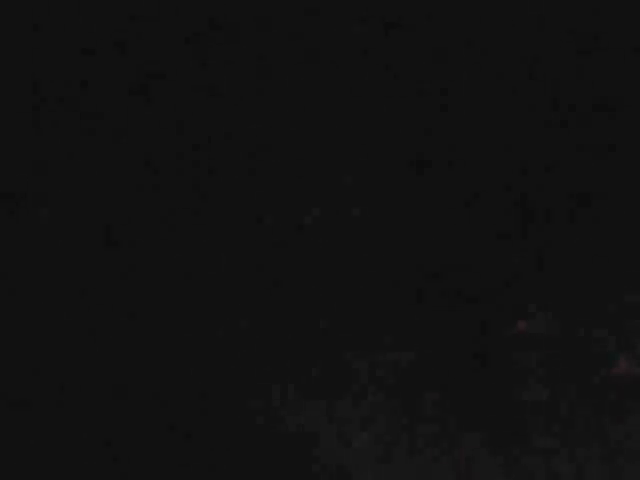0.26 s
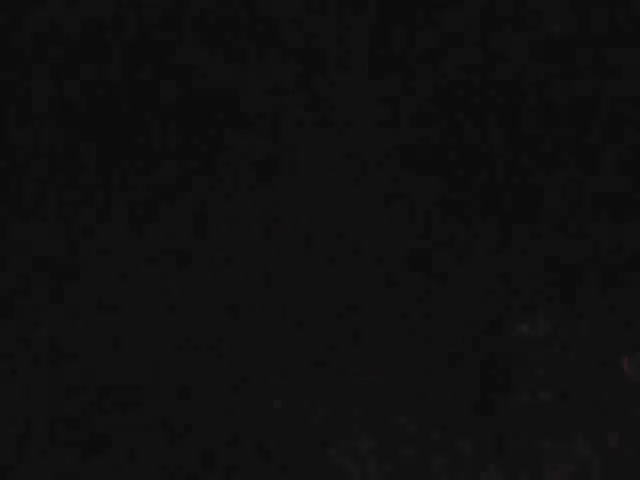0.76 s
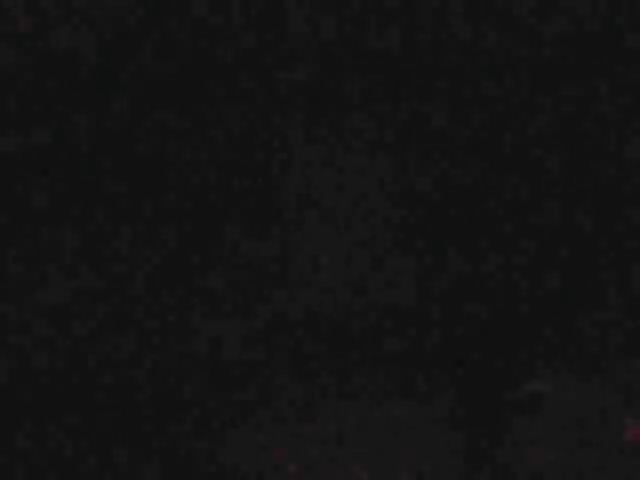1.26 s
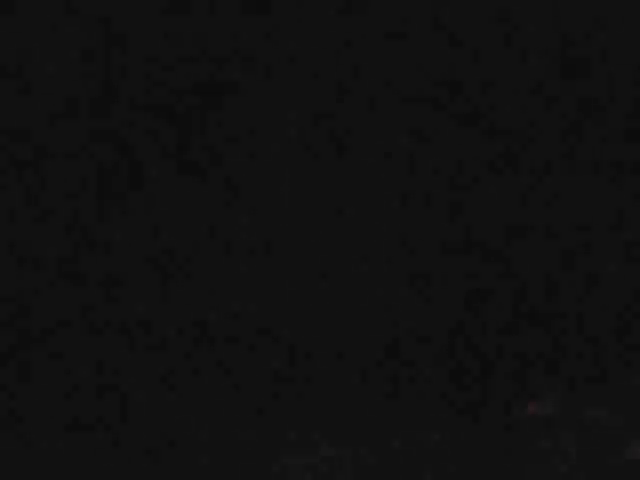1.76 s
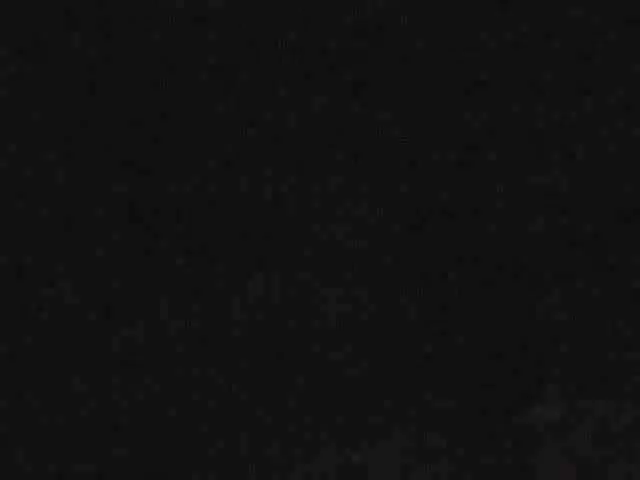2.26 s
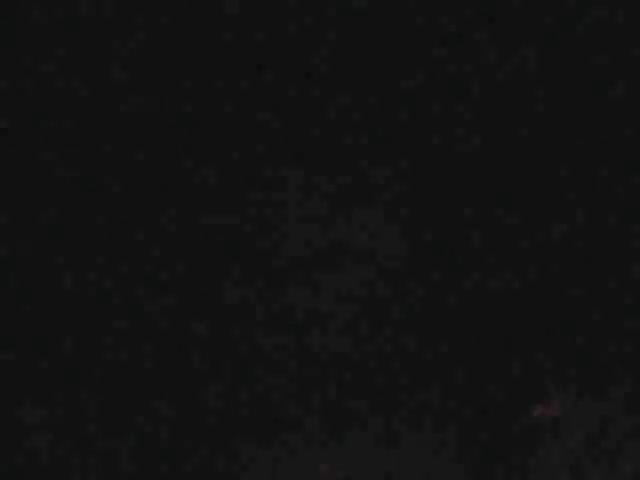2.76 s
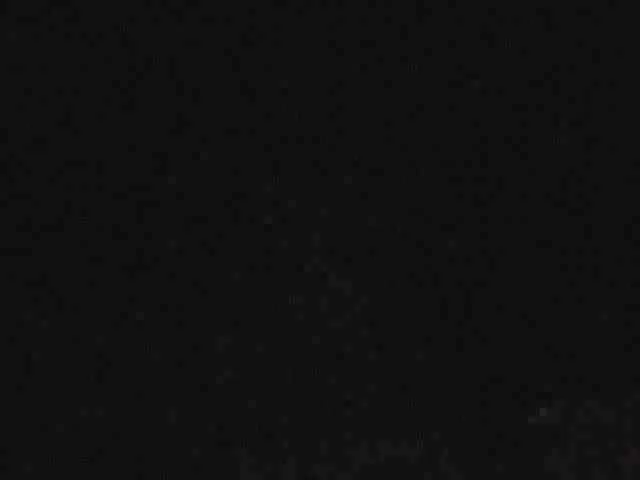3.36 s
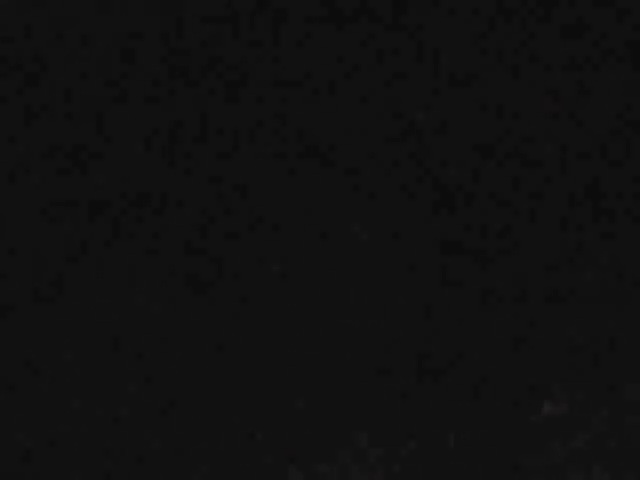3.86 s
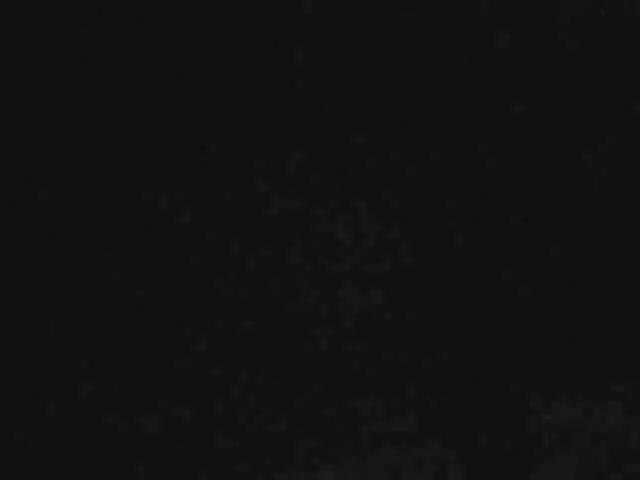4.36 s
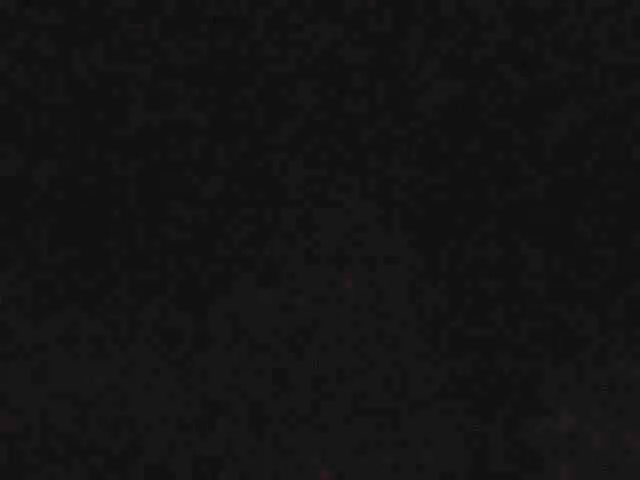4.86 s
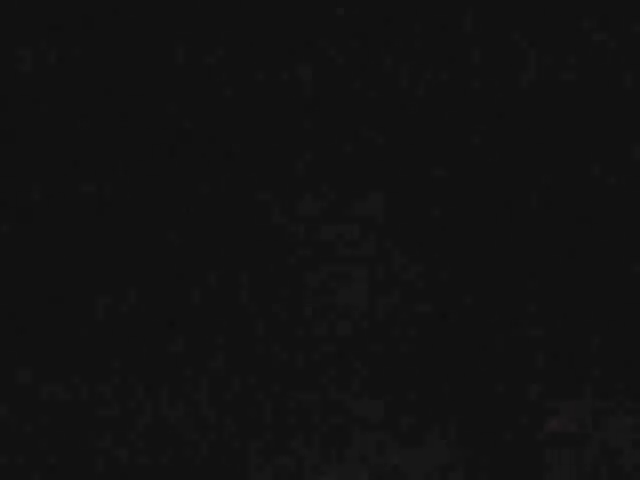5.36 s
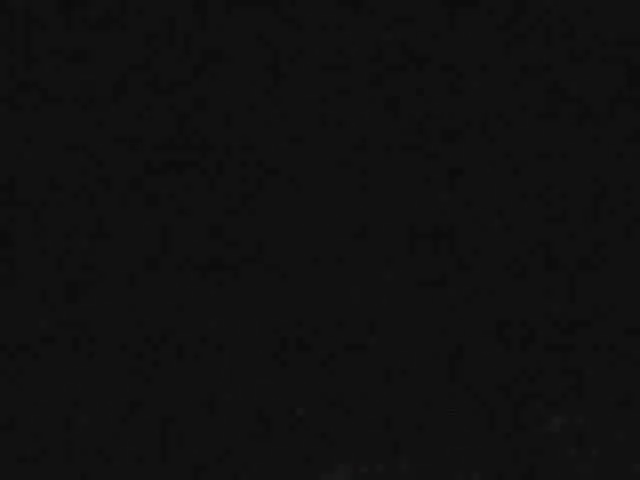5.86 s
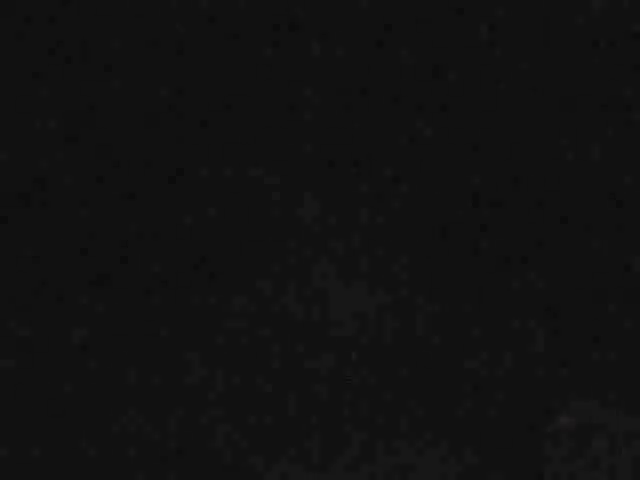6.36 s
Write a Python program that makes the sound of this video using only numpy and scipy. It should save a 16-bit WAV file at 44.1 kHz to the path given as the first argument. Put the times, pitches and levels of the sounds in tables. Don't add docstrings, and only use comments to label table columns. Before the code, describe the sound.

An unseen animal screams harshly in a dark, echoing yard, its raspy calls falling in pitch, between small squeaks and a fainter distant answer.

```python
import sys
import numpy as np
from scipy import signal
from scipy.fft import rfft, irfft
from scipy.io import wavfile

SR = 44100
rng = np.random.default_rng(int(sys.argv[2]) if len(sys.argv) > 2 else 0)


def output_pcm(signal):
    pcm = np.clip(np.atleast_2d(signal).T, -1, 1) * 32767
    wavfile.write(sys.argv[1], SR, np.round(pcm).astype(np.int16))


def decibels_to_gain(level_db):
    exponent = np.asarray(level_db, float) / 20
    return 10 ** exponent


N = 291942
LEAD = SR // 2

# (frequency [Hz], density [dB per Hz])
NIGHT_SPECTRUM = [(13, -39), (22, -15), (27, -8), (59, 0), (159, -8.5), (193, -6), (369, -13), (692, -19.5),
                  (762, -13.5), (839, -16.5), (1040, -13), (1360, -20), (4650, -32.5), (7000, -55),
                  (9100, -92), (15400, -120)]
NIGHT_DB = -45.5
# (start [s], end [s])
HORN = [(432, -54)]
HORN_SPAN = (1.6, 1.74)
# (time [s], peak level [dB], frequency [Hz])
TWIGS = [
    (0.0344, -34, 2960),
    (0.1621, -28, 3040),
    (0.7382, -16, 3266),
]

# (delay [s], level [dB])
WALLS = [
    (.03, -12),
    (.075, -6.5),
    (.19, -16),
    (.3, -20),
]
# (centre [Hz], decay time t60 [s], level [dB])
RINGING = [(554, 3.2, -1.5), (1350, 1.9, -8), (2256, 1.23, -1.5), (5400, 1.1, -7)]
# (delay [s], spread [s], level [dB], top [Hz])
FAR_RETURN = (.53, .05, -10, 850.0)

# (time [s], pitch [Hz], effort [dB])
EARLIER_BREATH = [(-.4, 585, -33), (-.2, 546, -39.5), (-.04, 540.5, -49.5), (.12, 547, -69)]
SCREAM_1_BREATH = [(.375, 584, -34.5), (.41, 576.3, -25.5), (.52, 565.8, -24.5), (.75, 551.1, -24.5),
                   (.89, 522, -27.5), (1.0, 472, -25.5), (1.08, 426.5, -33), (1.12, 419, -31)]
BARK_1_BREATH = [(1.35, 508, -28.5), (1.39, 517.2, -25.5), (1.41, 506, -27.5), (1.46, 416.5, -37.5),
                 (1.52, 363, -44)]
BARK_2_BREATH = [(1.81, 566, -44), (1.846, 585.6, -31), (1.91, 599.2, -33), (1.96, 589, -39.5)]
SCREAM_2_BREATH = [(2.7, 545.5, -29.5), (2.72, 562, -23), (2.78, 536, -28.5), (2.86, 503, -31.5),
                   (2.92, 378.5, -33), (2.96, 319, -27.5)]
SCREAM_3_BREATH = [(4.065, 517.5, -41.5), (4.11, 540, -23), (4.19, 517, -28.5), (4.35, 502.3, -31.5),
                   (4.38, 463.4, -30), (4.412, 386, -30), (4.455, 318, -27)]
SCREAM_4_BREATH = [(5.35, 565.7, -40), (5.41, 573.8, -23.5), (5.58, 566.4, -23.5), (5.64, 561.7, -20),
                   (5.85, 550, -22.5), (5.93, 539.7, -21.5), (6.0, 521, -24.5), (6.07, 407.2, -27.5),
                   (6.12, 370, -31.5)]
# (frequency [Hz], level [dB])
WIDE_THROAT = [(1120, -18), (1900, -6.5), (2520, -6), (2770, 0), (3000, -12), (4550, -11.5), (4800, -19.5),
               (6520, -26.5), (7000, -33), (9100, -85), (15400, -120)]
TIGHT_THROAT = [(940, -34.5), (1600, 1.5), (1870, -15), (2190, -1), (3530, -11.5), (3750, -6),
                (5110, -25.5), (6190, -21), (7000, -43), (9100, -71), (15400, -120)]
NARROWING_THROAT = [(1060, -38), (1800, -5.5), (2030, -10.5), (2650, -3), (3330, -17.5), (3620, -8),
                    (4150, -10.5), (5670, -28.5), (7000, -17.5), (9100, -80), (15400, -120)]
OPEN_THROAT = [(1120, -66), (1900, -10.5), (2190, -0.5), (2460, -4.5), (2880, 1.5), (3100, -23),
               (3300, -6.5), (5100, -12), (7000, -25.5), (9100, -70), (15400, -120)]
BARK_THROAT = [(1120, -44), (1900, -14), (2560, -11), (2910, -7), (3160, -24.5), (3660, -14), (5130, -30),
               (7000, -34.5), (9100, -80), (15400, -120)]
# (frequency [Hz], level [dB])
DISTANT_THROAT = [(3000, 0), (3700, -1), (4300, -16), (6000, -26)]
# (lowest line re effort [dB], next line re effort [dB], bloom of both [dB/s],
# change of the next line [dB per octave of fall])
CALL_VOICES = [(-13, -10.5, 2.5, -10.5), (-16.5, -14, 13.7, -22), (-7, -18, 2.5, -14), (-19, -12, 9, -10.5),
               (-11, -12.5, 30, -44.5), (-11, -12, 17, -37.5), (-18.5, -16.5, 17.2, -15.5)]
CALL_MOUTHS = [(1.31, .3), (.97, .45), (0.83, 0.22), (1.0, 0.00061), (0.949, -0.081), (0.972, 0.093),
               (1.029, .75)]
CALL_HOARSENESS = [
    [(0, .6), (1, .5)],
    [(0, .22), (.48, .25), (.55, .9), (.75, .8), (1, .45)],
    [(0, .8), (1, .9)],
    [(0, .7), (1, .65)],
    [(0, .45), (.6, .3), (1, .7)],
    [(0, .45), (.4, .2), (.75, .15), (.9, .7), (1, .7)],
    [(0, .4), (.2, .4), (.3, .2), (.38, .45), (.65, .38), (.76, .12), (1, .2)],
]
# (start [s], end [s])
SHRILL = [(4522, -31.5), (5373, -46), (5652, -44.5), (6503, -39.5)]
SHRILL_SPAN = (5.51, 5.64)

# (start [s], length [s], pitch [Hz], end pitch factor [1], peak level [dB])
SQUEAK_NOTES = [
    (.352, 0.11, 1860, 1.1, -41),
    (1.335, .075, 1958, .98, -33.5),
    (1.793, 0.069, 1680, 1.1, -42),
    (2.67, .065, 1724, 1.05, -35.5),
    (4.05, 0.17, 1670, 1.04, -42.5),
]
YELP_NOTES = [
    (1.96, .11, 1719, 0.8, -29.5),
]
SWELL_NOTES = [
    (5.24, 0.18, 1580, .86, -37.5),
]
PEEP_NOTES = [
    (5.31, .1, 1294, 1, -37.5),
]
WHIMPER_NOTES = [
    (1.2, 0.17, 900, 1.01, -47),
    (1.995, .155, 1700, 0.33, -48.5),
]
ANSWER_NOTES = [
    (2.961, .2, 1180, 0.93, -37.5),
]
CROAK_NOTES = [
    (3.27, .23, 1062, .92, -41.5),
]
MUTTER_NOTES = [
    (4.47, .28, 1139, 0.97, -39),
]
# (peak place [0-1], start [dB], end [dB], lateness of the bend [exponent]),
# (lowest line [dB], next line [dB], upper lines [dB]), (roughness at start [0-1], at end [0-1])
SQUEAK_SHAPE = (0.15, 0.1, 8.6, 2.23), (-10, 0, -21.5), (.7, 0.97)
YELP_SHAPE = (0.7, -7.5, -12, 2.5), (-11, 0, -14), (0.26, .7)
SWELL_SHAPE = (.45, -14, -6, 1.5), (-20, 0, -12), (.9, .95)
PEEP_SHAPE = (0.2, -10, -2.5, 1.5), (-17.5, 0, -9.5), (.15, .4)
WHIMPER_SHAPE = (.3, 5, -8, 1.7), (0, -29.5, -38), (.1, .2)
ANSWER_SHAPE = (.3, -4, -16, 2.0), (-22, 0, 3), (.06, .5)
CROAK_SHAPE = (0.15, -15.5, -9.5, 0.86), (-10, 0, 4.4), (0.48, 0.74)
MUTTER_SHAPE = (.3, -4.5, -13.5, 2.0), (-21, 0, -1), (.5, .85)


def wander(size, hz):
    raw = rng.standard_normal(size + 2000) + 1j * rng.standard_normal(size + 2000)
    slow = signal.sosfilt(signal.butter(2, hz, fs=SR, output="sos"), raw)[2000:]
    return slow / np.std(slow)


def at_hz(points, hz):
    point_hz, point_db = np.transpose(points)
    return np.interp(np.log(hz), np.log(point_hz), point_db)


def fade(t, start, end, attack):
    return np.clip((t - start) / attack, 0, 1) * np.clip((end - t) / .035, 0, 1)


def tones(lines, start, end):
    t = np.arange(-LEAD, N) / SR
    sines = sum(decibels_to_gain(db) * np.sin(2 * np.pi * hz * t) for hz, db in lines)
    return np.sqrt(2) * fade(t, start, end, attack=.02) * sines


def night():
    hz = np.maximum(np.fft.rfftfreq(N, 1 / SR), 1)
    hum = irfft(rfft(rng.standard_normal(N)) * decibels_to_gain(at_hz(NIGHT_SPECTRUM, hz)), N)
    return decibels_to_gain(NIGHT_DB) * hum / np.std(hum)


def far_horn():
    return tones(HORN, *HORN_SPAN)[LEAD:]


def twig_ticks():
    t = np.arange(N) / SR
    out = np.zeros(N)
    for s, level_db, hz in TWIGS:
        age = np.maximum(t - s, 0)
        out += decibels_to_gain(level_db - 60 * age / 0.0085) * np.sin(2 * np.pi * hz * age)
    return out


def yard(x):
    t = np.arange(3 * LEAD) / SR
    response = np.zeros(len(t))
    response[0] = 1
    for delay, level_db in WALLS:
        response[round(delay * SR)] = decibels_to_gain(level_db)
    for hz, t60, level_db in RINGING:
        octave = signal.butter(2, [hz / np.sqrt(2), hz * np.sqrt(2)], "band", fs=SR, output="sos")
        tail = rng.standard_normal(len(t)) * decibels_to_gain(-60 * t / t60) * np.clip(t / 0.013, 0, 1)
        response += decibels_to_gain(level_db) * signal.sosfilt(octave, tail / np.sqrt(np.sum(tail ** 2)))
    delay, spread, level_db, top_hz = FAR_RETURN
    burst = rng.standard_normal(len(t)) * np.exp(-.5 * ((t - delay) / spread) ** 2)
    dull = signal.butter(4, top_hz, fs=SR, output="sos")
    response += decibels_to_gain(level_db) * signal.sosfilt(dull, burst / np.sqrt(np.sum(burst ** 2)))
    return signal.fftconvolve(x, response)[LEAD:LEAD + N]


def call(rows, throat, half_db, count, order):
    s, *columns = np.transpose(rows)
    start, end = round(s[0] * SR), round(s[-1] * SR)
    t = np.arange(start, end) / SR
    pitch, upper_db, rough, mouth, *lines_db = [np.interp(t, s, c) for c in columns]
    sluggish = signal.butter(2, 11, fs=SR, output="sos")
    pitch = signal.sosfiltfilt(sluggish, pitch, padlen=len(t) - 1)
    jitter = 1 + 0.0038 * wander(len(t), 25.0).real
    phase = 2 * np.pi * np.cumsum(pitch * jitter) / SR

    whole = list(range(order + 2, count + 1))
    halves = [k + .5 for k in whole[:4]]
    upper = [decibels_to_gain(at_hz(throat, k * pitch * mouth) + half_db * (k in halves)) for k in whole + halves]
    total = np.sqrt(sum(g ** 2 for g in upper)) + 1e-9
    gains = [decibels_to_gain(db) for db in lines_db] + [decibels_to_gain(upper_db) * g / total for g in upper]

    wave = 0
    for k, gain in zip([order, order + 1] + whole + halves, gains):
        noisy = np.clip(rough * np.minimum(k * pitch / 2300, 1.15) ** 2.97, 0, 1)
        flutter = decibels_to_gain(2.97 * wander(len(t), 30.0).real)
        shape = np.sqrt(1 - noisy) * flutter + np.sqrt(noisy) * wander(len(t), 220.0)
        turning = np.exp(1j * (k * phase + rng.uniform(0, 2 * np.pi)))
        wave = wave + gain * (shape * turning).real
    out = np.zeros(N + LEAD)
    out[LEAD + start:LEAD + end] = np.sqrt(2) * wave * fade(t, s[0], s[-1], attack=0.0074 * order)
    return out


def note_rows(note, shape):
    start, length, hz, bend, peak_db = note
    (place, start_db, end_db, late), (lowest_db, next_db, upper_db), (rough_start, rough_end) = shape
    share = np.linspace(0, 1, 20)
    level_db = peak_db + np.interp(share, [0, np.clip(place, .05, .95), 1], [start_db, 0, end_db])
    pitch = hz * bend ** (share ** late)
    rough = rough_start + (rough_end - rough_start) * share
    return np.transpose([start + length * share, pitch, level_db + upper_db, rough,
                         np.ones(20), level_db + lowest_db, level_db + next_db])


def short_notes(kinds, throat, half_db):
    return sum(call(note_rows(note, shape), throat, half_db, count=4, order=1)
               for notes, shape in kinds for note in notes)


def far_answers():
    kinds = [(ANSWER_NOTES, ANSWER_SHAPE), (CROAK_NOTES, CROAK_SHAPE), (MUTTER_NOTES, MUTTER_SHAPE)]
    return short_notes(kinds, DISTANT_THROAT, half_db=-27.5)


def near_squeaks():
    kinds = [(SQUEAK_NOTES, SQUEAK_SHAPE), (YELP_NOTES, YELP_SHAPE), (SWELL_NOTES, SWELL_SHAPE),
             (PEEP_NOTES, PEEP_SHAPE), (WHIMPER_NOTES, WHIMPER_SHAPE)]
    return short_notes(kinds, TIGHT_THROAT, half_db=-24.0)


def shrill_whistle():
    return decibels_to_gain(3.0) * tones(SHRILL, *SHRILL_SPAN)


def scream_rows(breath, voice, mouth, hoarse):
    s, pitch, effort_db = np.transpose(breath)
    lowest_db, next_db, bloom_db, fall_db = voice
    size, follow = mouth
    t = np.linspace(s[0], s[-1], 60)
    age, left = t - s[0], s[-1] - t
    pitch, effort_db = np.interp(t, s, pitch), np.interp(t, s, effort_db)
    fall = pitch.max() / pitch
    rough = np.interp(age / age[-1], *np.transpose(hoarse)) + .4 * np.exp(-age / .035)
    late_db = -25.5 * np.exp(-age / 0.023)
    early_end_db = -15.5 * np.exp(-left / .03)
    lines_db = effort_db + bloom_db * age + late_db + early_end_db
    rasp_feed_db = 7.5 * rough
    return np.transpose([t, pitch, effort_db, rough, size * fall ** follow, lines_db + lowest_db,
                         lines_db + next_db + rasp_feed_db + fall_db * np.log2(fall)])


def screams():
    # (breath, throat, level of the half-order lines [dB])
    calls = [(EARLIER_BREATH, OPEN_THROAT, -12), (SCREAM_1_BREATH, WIDE_THROAT, -14),
             (BARK_1_BREATH, TIGHT_THROAT, -6), (BARK_2_BREATH, BARK_THROAT, -12),
             (SCREAM_2_BREATH, TIGHT_THROAT, -12), (SCREAM_3_BREATH, NARROWING_THROAT, -10),
             (SCREAM_4_BREATH, OPEN_THROAT, -14)]
    out = np.zeros(N + LEAD)
    for (breath, throat, half_db), *manner in zip(calls, CALL_VOICES, CALL_MOUTHS, CALL_HOARSENESS):
        out += call(scream_rows(breath, *manner), throat, half_db, count=17, order=2)
    return out


def scene():
    animals = far_answers() + near_squeaks() + shrill_whistle() + screams()
    return (night() + far_horn() + twig_ticks() + yard(animals))[None, :]


def low_pass(x):
    return signal.sosfilt(signal.butter(12, 7230, fs=SR, output="sos"), x)


def record(dry):
    narrow = signal.sosfilt(signal.cheby2(10, 70, 7900.0, fs=SR, output="sos"), dry)
    offset, hiss_db = 0.01505, -73.5
    mix = narrow + offset + decibels_to_gain(hiss_db) * rng.standard_normal(dry.shape)
    return low_pass(mix)


dry = scene()
out = record(dry)
output_pcm(out)
```